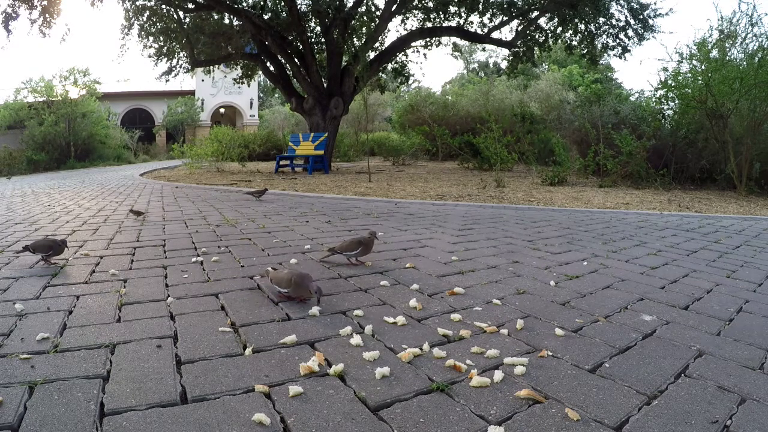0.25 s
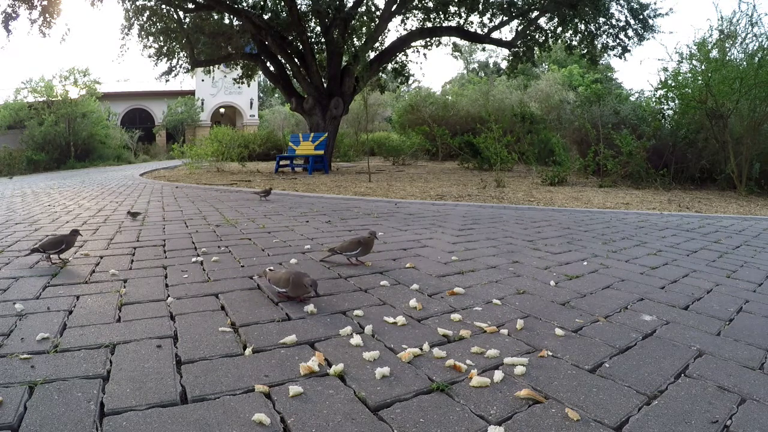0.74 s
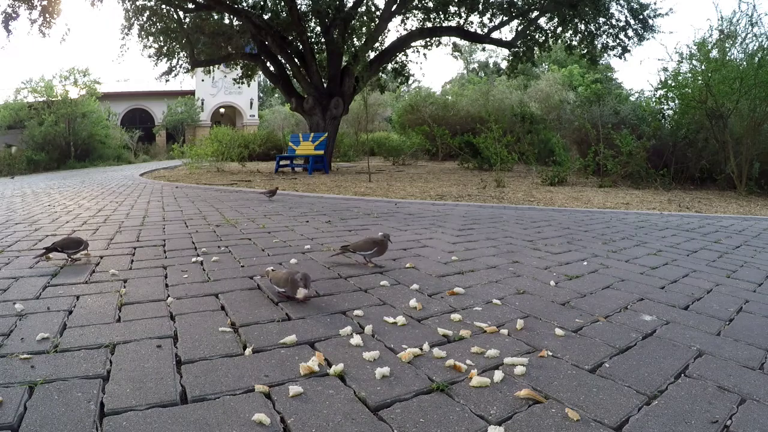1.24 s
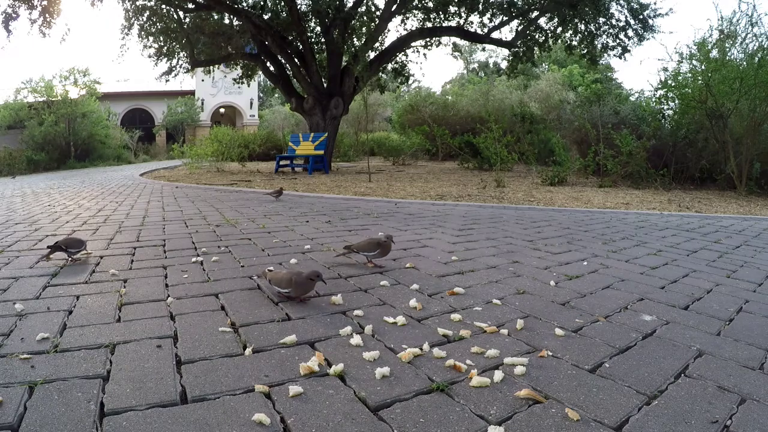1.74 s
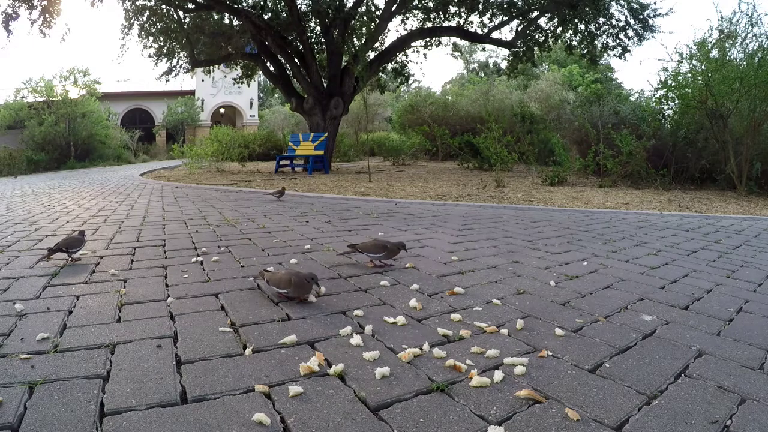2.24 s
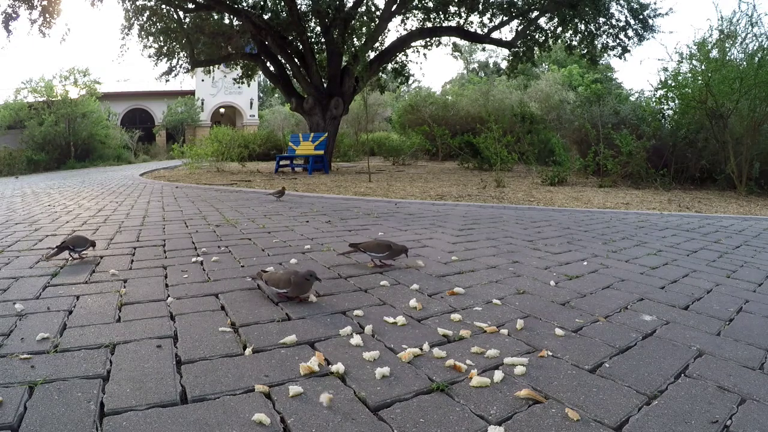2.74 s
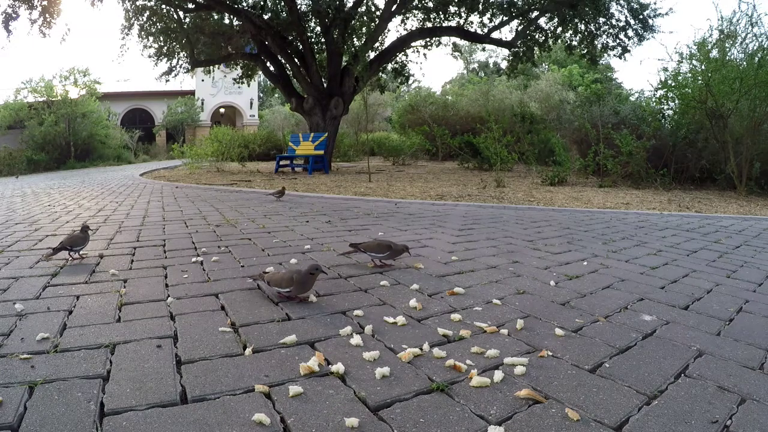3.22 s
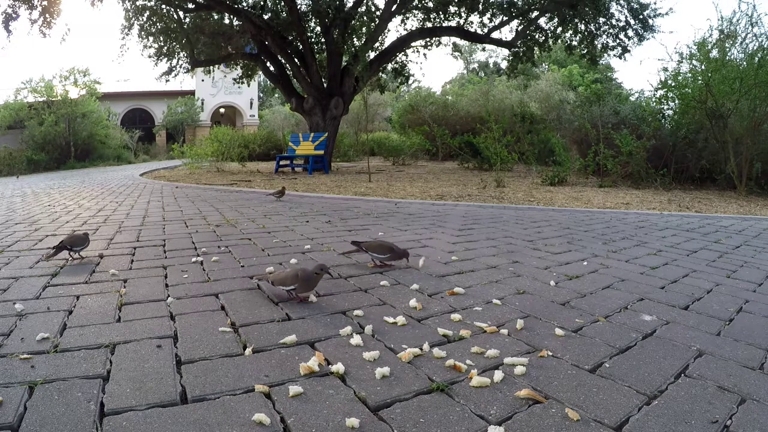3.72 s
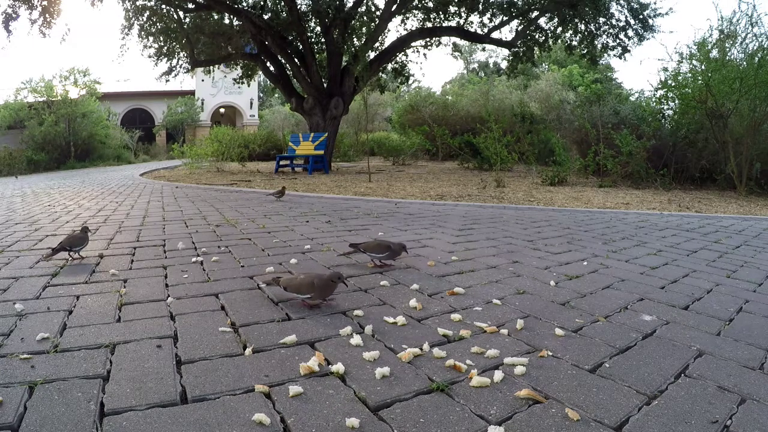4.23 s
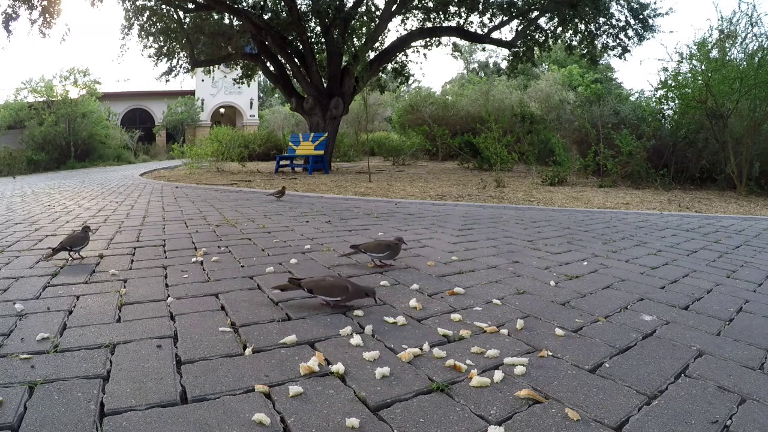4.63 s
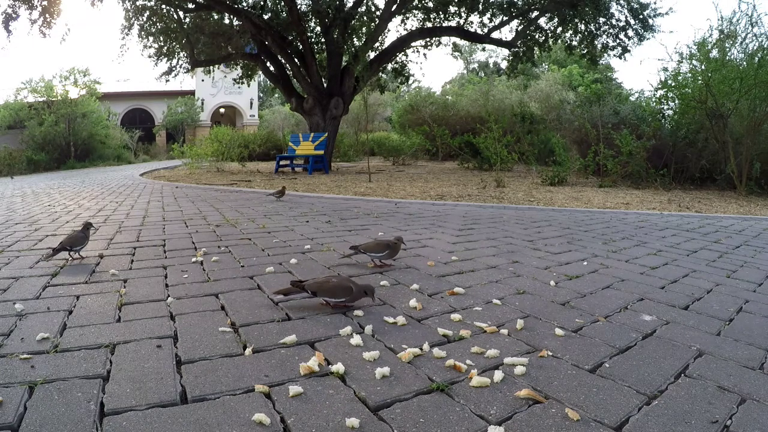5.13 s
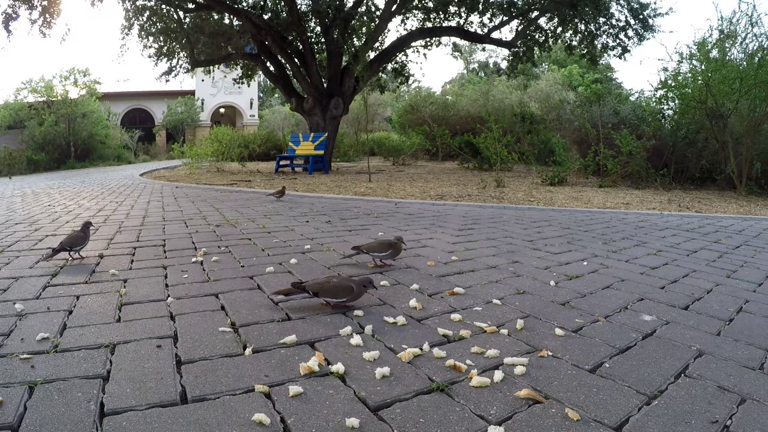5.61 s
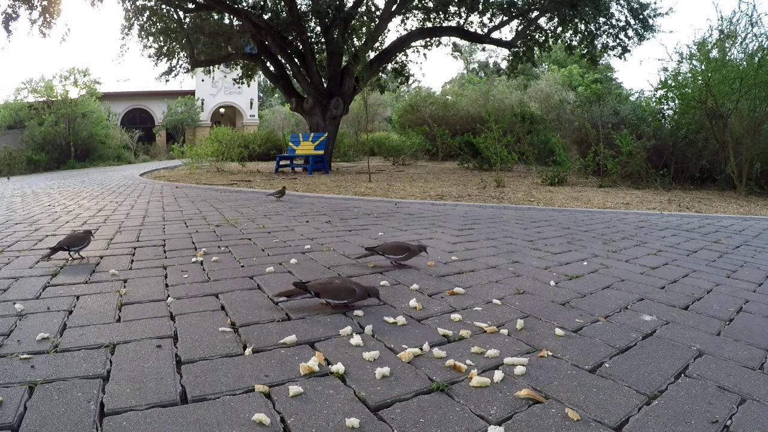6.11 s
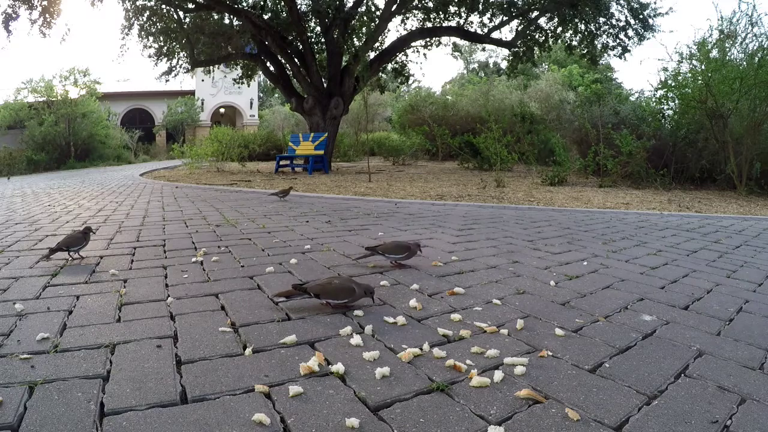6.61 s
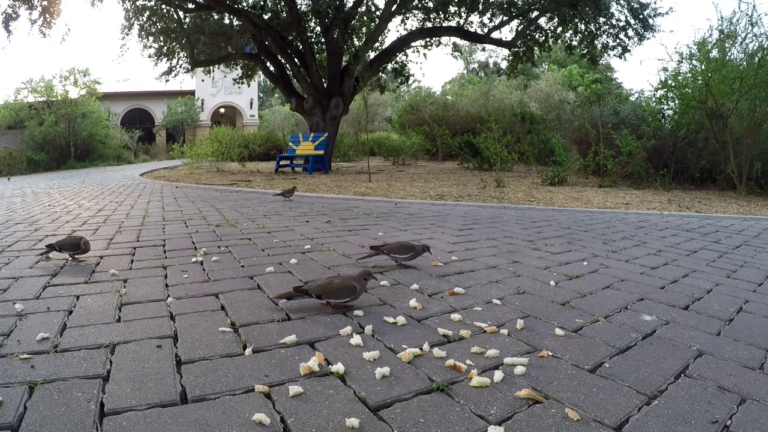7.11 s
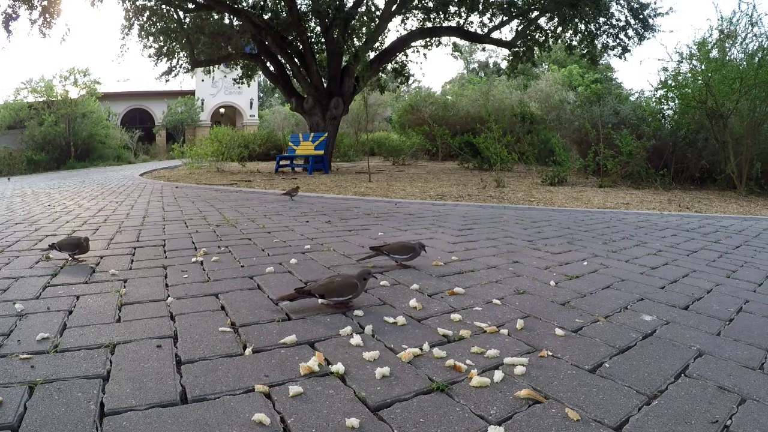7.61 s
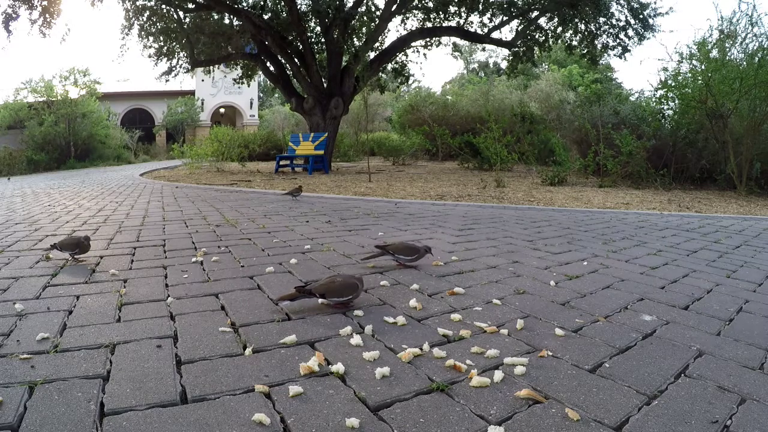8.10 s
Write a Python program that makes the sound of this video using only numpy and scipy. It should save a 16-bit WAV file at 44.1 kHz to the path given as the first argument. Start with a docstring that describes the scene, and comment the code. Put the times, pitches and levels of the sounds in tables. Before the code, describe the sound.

A harsh bird rasps three-syllable phrases, a nearer bird squeals and chatters, then several hoarse birds erupt in a loud overlapping chorus over low hum.

```python
"""Chachalacas over a humming park square

One bird rasps three-syllable phrases, a far one answers, then three voices overlap in a loud chorus.
Uneven membrane pulses and puffs of air, coloured by throat resonances, make the rasps, cries and squeals.
A nearer bird squeals and chatters; wavering sines make a dove's coo and a small bird's peeps, and a beak taps.
Scattered echoes surround most calls; filtered noise and two drones make a low machine hum and a faint hiss."""
import sys
import numpy as np
from scipy import signal
from scipy.fft import rfft, irfft, next_fast_len
from scipy.io import wavfile

SR = 44100
rng = np.random.default_rng(int(sys.argv[2]) if len(sys.argv) > 2 else 0)


def master_out(mix):
    """Clip the mix to full scale and print it as 16-bit PCM to the path in sys.argv[1]."""
    frames = np.transpose(np.atleast_2d(mix))
    ceiling = np.clip(frames, -1, 1)
    pcm = np.round(ceiling * 32767).astype(np.int16)
    wavfile.write(sys.argv[1], SR, pcm)


N = 368235
T = np.arange(N) / SR

# Syllables of the first bird, three phrases of three. Each row: start in seconds, length in seconds,
# pitch in Hz, rise in Hz per second, relative level in dB, swell in dB, relative ringing tone level in dB.
RASP_SYLLABLES = [(0.051, .14, 614.3, 606, -37, -6, -43), (.255, 0.1, 580.7, 1001, -33.5, -3.5, -35.5),
                  (0.394, 0.29, 602, -0.5, -36, -3, -38.5), (1.013, 0.13, 612.5, 500.5, -35, -11, -45.5),
                  (1.185, 0.12, 613.7, 1009, -33, -10.5, -39), (1.315, 0.22, 597.6, 102, -36, -5, -38),
                  (1.947, .15, 613, 499, -35.5, -7.5, -71), (2.126, .11, 625, 1190, -32.5, -5, -39),
                  (2.262, 0.22, 615, 252.5, -35, -4, -37)]
# Distant syllables: a far bird's phrase twice, then faint stray calls, the last from another bird.
# Each row: start in seconds, length in seconds, pitch in Hz, rise in Hz per second, relative level in dB,
# swell in dB, relative ringing tone level in dB.
DISTANT_SYLLABLES = [(3.24, 0.11, 630, 99, -50.5, 10, -51), (3.46, 0.093, 631.6, 101, -50.5, -16, -46),
                     (3.61, 0.18, 626.4, -60.5, -47, -2, -46), (4.205, 0.1388, 659, 201, -48.5, 0, -50),
                     (4.42, 0.072, 633, -100, -45, -9, -51), (4.565, 0.1934, 638.4, 62, -49.5, -10, -47.5),
                     (4.79, 0.22, 625, -4.5, -62.5, -5, -60), (5.11, 0.113, 587, -14, -57, 1, -54),
                     (5.2, 0.078, 636, 3.5, -62, -6, -54), (5.54, 0.066, 738, -14, -50.5, -5, -59),
                     (5.62, .11, 727, -1200, -50.5, 0, -50.5)]
# Hoarse syllables of the chorus: low ones from one bird and brighter, arched ones from a higher bird.
# Each row: start in seconds, length in seconds, pitch in Hz, rise in Hz per second, relative level in dB,
# swell in dB, relative undertone level in dB, brightness from 0 to 1.
HOARSE_SYLLABLES = [(5.64, 0.084, 625, 301, -42, -3, -70, 0.11),
                    (5.833, 0.15, 641, 999, -34.5, -8, -56, 0.13),
                    (5.979, 0.099, 657, 4, -33, 4.5, -54, 0.48),
                    (6.142, 0.16, 674.2, 6.5, -33.5, -7, -70, 0.91),
                    (6.397, 0.17, 623.5, 1099.5, -32.5, 2, -50, 0),
                    (6.608, 0.13, 664, 805, -29, 5, -51, 0.06),
                    (6.735, .18, 672.7, 48, -28.5, 2, -46.5, 0.2),
                    (6.953, 0.2, 821, -4.5, -26.5, -1.5, -57, 0.96),
                    (7.241, 0.051, 646.5, 1103.5, -60, -7, -54, 0.03),
                    (7.297, .145, 637.2, 950, -32, 6, -50, 0),
                    (7.505, 0.13, 677, 847, -28.5, 0, -48.5, 0.04),
                    (7.627, 0.19, 679.4, 149, -27.5, 0, -46.5, 0.06),
                    (7.863, 0.2, 801, -3, -30.5, -10, -63, 0.95),
                    (8.216, .15, 652, 697, -29.5, 4.5, -48, 0.01)]
# Throat colour of the gliding notes and wails. Each row: frequency in Hz, relative level in dB.
CLEAR_THROAT = [(600, -32), (1050, -23), (1450, 12), (2000, 2), (2400, -10.5), (2850, -19), (3250, -7.5),
                (3800, -4.5), (4150, -13), (4480, -0.5), (4850, -13), (5500, -8), (7000, -13.5),
                (8000, -27), (9500, -27), (13000, -40)]

# A note's ends lie below its top by this much for each second of its length.
RASP_SAG_HZ_PER_S, HOARSE_SAG_HZ_PER_S = 200, 220


def from_db(db):
    """Decibels to gain."""
    return 10 ** (np.asarray(db) / 20)


def rms_one(x):
    """Scale to unit power."""
    return x / np.sqrt(np.mean(x ** 2) + 1e-20)


def in_time(rows):
    """Each column of a curve at every sample."""
    s, *columns = np.transpose(rows)
    return [np.interp(T, s, column) for column in columns]


def during(rows):
    """Open while a curve lasts, with short fades outside it."""
    first, last = rows[0][0], rows[-1][0]
    return np.interp(T, [first - .03, first, last, last + .03], [0, 1, 1, 0])


def coloured(x, spectrum):
    """Give a steady sound a spectrum; unit power."""
    size = next_fast_len(len(x))
    hz, db = np.transpose(spectrum)
    bins = np.maximum(np.arange(size // 2 + 1) * SR / size, 1)
    skirts = np.minimum(1, bins / hz[0]) ** 2 * np.minimum(1, hz[-1] / bins) ** 2
    colour = from_db(np.interp(np.log(bins), np.log(hz), db))
    return rms_one(irfft(rfft(x, size) * skirts * colour, size)[:len(x)])


def flutter(rate_hz, count):
    """Random wavering up to a given rate; spread 1."""
    run_in = 8000  # samples for the filter to settle
    lowpass = signal.butter(2, rate_hz, fs=SR, output="sos")
    return rms_one(signal.sosfilt(lowpass, rng.standard_normal(count + run_in))[run_in:])


def swing(pitch_hz, jitter, rate_hz):
    """Phase of a membrane whose cycles are uneven."""
    return 2 * np.pi * np.cumsum(pitch_hz * (1 + jitter * flutter(rate_hz, len(pitch_hz)))) / SR


def syrinx(phase, hiss, shimmer_db, count=20, partials=None):
    """One smeared pulse and one puff of air a cycle, of uneven strength; partials may have their own gains."""
    pulses = 0
    for k in range(count):
        gain = partials[k] if partials else 1
        pulses = pulses + gain * np.cos((k + 1) * phase + np.pi / 2 * k * k / count)
    puffs = rms_one((1 + np.cos(phase)) * rng.standard_normal(len(phase)))
    return (rms_one(pulses) + hiss * puffs) * from_db(shimmer_db * flutter(145, len(phase)))


def add(out, start_s, sound):
    """Mix a sound in at a given time."""
    at = max(0, int(start_s * SR))
    out[at:at + len(sound)] += sound[:max(0, N - at)]


def arch(start_hz, middle_hz, end_hz, count):
    """Pitch bends through a middle value with the pressure behind a chip."""
    u = np.linspace(-1, 1, count)
    slope = (end_hz - start_hz) / 2
    bend = (start_hz + end_hz) / 2 - middle_hz
    return middle_hz + slope * u + bend * u ** 2


def glide(length_s, pitch_hz, rise_hz_per_s, sag_hz_per_s, flat=2):
    """Pitch of a note: an arch on a slope, deeper the longer it lasts; a higher power holds the top longer."""
    u = np.linspace(-1, 1, int(max(length_s, .01) * SR))
    return pitch_hz + length_s * (rise_hz_per_s * u / 2 - sag_hz_per_s * np.abs(u) ** max(flat, 1))


def phrasing(rows, sags_hz_per_s, attack_s, release_s):
    """Gain and pitch of a run of syllables: each opens, swells while it is held, then dies away."""
    power, pitch = np.zeros(N), np.full(N, float(rows[0][2]))
    sags = np.broadcast_to(sags_hz_per_s, len(rows))
    for (start, length, pitch_hz, rise, db, swell_db, *_), sag in zip(rows, sags):
        t, at = T[:SR], int(max(start, 0) * SR)
        held = from_db(db + swell_db * (np.minimum(t / length, 1) - .5))
        opening = np.tanh(t / attack_s) ** 1.16
        dying = np.exp(-np.maximum(t - length, 0) / release_s)
        add(power, start, (held * opening * dying) ** 2)
        # the last pitch holds until the next syllable
        pitch[at:] = np.pad(glide(length, pitch_hz, rise, sag), (0, N), "edge")[:N - at]
    return np.sqrt(power), pitch


def rattle(rate_hz, depth_db):
    """The membranes slap in uneven beats, which give a rasp its grain."""
    beats = np.sin(swing(np.full(N, float(rate_hz)), .35, rate_hz=60))
    return rms_one(from_db(depth_db * beats))


def throat_shift(rows, opens, wander):
    """Factor on the throat's resonances: they climb through each syllable and wander."""
    points = [(start + length * (.5 + .4 * end), end) for start, length, *_ in rows for end in (-1, 1)]
    opening, = in_time(points)
    return 1 + opens * opening + wander * flutter(22, N)


def moving_throat(x, throat, shift, count=7):
    """Colour a voice with resonances that slide by a factor, by fading between fixed throats."""
    steps, out = np.linspace(.88, 1.12, count), 0
    for step, share in zip(steps, np.eye(count)):
        throat_now = [(hz * step, db) for hz, db in throat]
        out = out + np.interp(shift, steps, share) * coloured(x, throat_now)
    return out


def restless(x, depth_db, rate_hz, count=16):
    """Beak and throat never hold still, so each region of the voice swells and fades on its own."""
    size = next_fast_len(N)
    spectrum, hz = rfft(x, size), np.arange(size // 2 + 1) * SR / size
    centres, out = np.geomspace(900, 7000, count), 0
    for share in np.eye(count):
        gain = rms_one(from_db(depth_db * flutter(rate_hz, N)))
        out = out + gain * irfft(spectrum * np.interp(hz, centres, share), size)[:N]
    return out


def note(pitch_hz, rough, throat, edge, jitter, shimmer_db, count, air=0.58, torn_db=0, bright_db=0):
    """An unsteady note through a throat; roughness adds jitter and air, and partials tear and return alone."""
    n = len(pitch_hz)
    phase = swing(pitch_hz * (1 + .005 * flutter(50, n)), jitter * rough, rate_hz=205)
    partials = []
    for k in range(count):
        tear_db = torn_db * np.tanh(flutter(40, n)) if torn_db else 0
        partials.append(from_db(bright_db * min(k, 3) + tear_db))
    voice = coloured(syrinx(phase, air * rough, shimmer_db, count=count, partials=partials), throat)
    return voice * signal.windows.tukey(n, np.clip(edge, 0, 1))


def notes(rows, sag_hz_per_s, throat, flat=2, **voice):
    """Notes that share an arch and a voice."""
    out = np.zeros(N)
    for start, length, pitch_hz, rise, db, rough, bright_db in rows:
        pitch = glide(length, pitch_hz, rise, sag_hz_per_s, flat)
        add(out, start, from_db(db) * note(pitch, rough, throat, bright_db=bright_db, **voice))
    return out


def rasping_bird():
    """Nearly chaotic pulses rattle through a row of sliding throat resonances."""
    # Throat colour of the first bird. Each row: frequency in Hz, relative level in dB.
    rasp_throat = [(400, -56), (700, 2.5), (900, 0.5), (1250, 5), (1550, -1.5), (1930, 5), (2200, -1),
                   (2500, 5.5), (2680, 2.5), (2840, 7), (3050, 0), (3600, -4), (4400, 2), (5300, -1.5),
                   (6250, 1.5), (6750, -14), (7500, -14.5), (9800, -17), (12000, -38)]
    gain, pitch_hz = phrasing(RASP_SYLLABLES, RASP_SAG_HZ_PER_S, attack_s=0.055, release_s=0.036)
    pulses = syrinx(swing(pitch_hz, jitter=.1, rate_hz=400), hiss=.4, shimmer_db=1.0)
    pulses = pulses * rattle(100, depth_db=6)
    rasp = moving_throat(pulses, rasp_throat, throat_shift(RASP_SYLLABLES, opens=.01, wander=.016))
    return gain * from_db(2.4) * restless(rasp, depth_db=2.2, rate_hz=25)


def hoarse_birds():
    """Jitter smears high harmonics into a rasp: low syllables from one bird, bright arched ones from a higher."""
    # Throat colour of the low syllables. Each row: frequency in Hz, relative level in dB.
    low_throat = [(500, -43), (950, 1), (1350, 2.5), (1750, 0.5), (2150, -5.5), (2400, 6.5), (2700, 0.5),
                  (3000, -3.5), (3450, -2), (4050, -5.5), (4550, 5), (5150, -6), (6100, -4.5), (6800, -21),
                  (7900, -19), (9700, -20), (12500, -50)]
    # Throat colour of the bright syllables. Each row: frequency in Hz, relative level in dB.
    bright_throat = [(500, -49), (1050, 3.5), (1500, 11.5), (1900, 5.5), (2230, -18), (2550, 8),
                     (3000, -3.5), (3400, 9.5), (3800, 4), (4350, 4), (5000, 6), (5750, 8), (7200, -8.5),
                     (7900, -13.5), (9400, -9.5), (13000, -35)]
    brights = np.clip([row[-1] for row in HOARSE_SYLLABLES], 0, 1)
    sags_hz_per_s = HOARSE_SAG_HZ_PER_S + 480 * brights
    gain, pitch_hz = phrasing(HOARSE_SYLLABLES, sags_hz_per_s, attack_s=0.036, release_s=0.026)
    bright_points = [(start + length * share, bright)
                     for (start, length, *_), bright in zip(HOARSE_SYLLABLES, brights) for share in (.1, .9)]
    brightness, = in_time(bright_points)
    pulses = syrinx(swing(pitch_hz, jitter=.06, rate_hz=170), hiss=.4, shimmer_db=1.0)
    pulses = pulses * rattle(105, depth_db=3.8)
    shift = throat_shift(HOARSE_SYLLABLES, opens=.015, wander=.015)
    rasp = (1 - brightness) * moving_throat(pulses, low_throat, shift)
    rasp = rasp + brightness * moving_throat(pulses, bright_throat, shift)
    return gain * from_db(-2.2) * restless(rasp, depth_db=2.5, rate_hz=25)


def throat_tones():
    """The low harmonics scoop up and ring through each rasping syllable; under the hoarse ones they growl."""
    # Colour of the ringing tone. Each row: frequency in Hz, relative level in dB.
    ring_throat = [(550, -13.5), (850, 0), (1150, 4.5), (1320, 5), (1600, -10.5), (2000, -60), (2400, -42),
                   (2900, 4.5), (3500, -77)]
    # Colour of the growling undertone. Each row: frequency in Hz, relative level in dB.
    growl_throat = [(450, -6.5), (660, 8), (1000, 7), (1370, 3.5), (1700, 7), (2050, -7), (2600, 1.5),
                    (4000, -13)]
    ring_lingers_s, growl_lingers_s = 0.01284, 0.0217  # added to the syllable's length
    scoop, scoop_s = 0.0901, 0.02192  # the ring starts flat by this share and slides up with this time constant
    out = np.zeros(N)
    for start, length, pitch_hz, rise, _, _, db in RASP_SYLLABLES + DISTANT_SYLLABLES:
        pitch = glide(length + ring_lingers_s, pitch_hz, rise, RASP_SAG_HZ_PER_S)
        pitch = pitch * (1 - scoop * np.exp(-T[:len(pitch)] / scoop_s))
        pitch = pitch * (1 + .025 * flutter(45, len(pitch)))
        ring = note(pitch, .48, ring_throat, edge=.2, jitter=.11, shimmer_db=2.2, count=5, air=2.0, torn_db=4)
        add(out, start, from_db(db - 0.1) * ring)
    for start, length, pitch_hz, rise, _, _, db, _ in HOARSE_SYLLABLES:
        pitch = glide(length + growl_lingers_s, pitch_hz, rise, HOARSE_SAG_HZ_PER_S)
        pitch = pitch * (1 + .018 * flutter(60, len(pitch)))
        growl = note(pitch, 0.5, growl_throat, edge=0.26, jitter=.1, shimmer_db=3.2, count=5, air=1.9, torn_db=3)
        add(out, start, from_db(db + 5.7) * growl)
    return out


def wails(curves, rough, bright_db, voice):
    """Long arched cries whose level breaks and returns."""
    out = np.zeros(N)
    for rows in curves:
        held = slice(int(rows[0][0] * SR), int(rows[-1][0] * SR))
        pitch_hz, level_db = (column[held] for column in in_time(rows))
        cry = note(pitch_hz, rough, CLEAR_THROAT, edge=.15, bright_db=bright_db, **voice)
        out[held] += from_db(level_db) * cry
    return out


def clear_calls():
    """Sounds that stand out of the rasp with a true pitch: short glides, wails and yelps."""
    # Short gliding notes: bright glides in the first bird's opening syllables, a stray call, then the
    # chorus's yips. Each row: start in seconds, length in seconds, pitch in Hz, rise in Hz per second,
    # relative level in dB, roughness as a factor, brightness in dB per partial.
    glide_rows = [(.02, 0.073, 826, 1250, -47.5, 1.2, -2), (.1, 0.1, 891, 1252, -40.5, 1.24, -1),
                  (.18, 0.069, 1060, 1250, -46.5, .5, -10), (1.01, 0.086, 931, 1250, -44.5, 0.83, 0),
                  (1.83, 0.042, 795, 1253, -54, 0.19, -1), (1.945, 0.13, 904, 1506, -42, 0.9, -3.5),
                  (5.21, 0.095, 843.5, 1250, -52.5, 0.93, 0), (5.61, 0.12, 803, -900, -47, 0.4, 2),
                  (5.875, 0.067, 1008, 3002, -38.5, 0.37, 0.5), (5.937, 0.019, 860, -12000, -39, 0.35, 4),
                  (5.955, 0.023, 917, 992, -37, 0.1, 0.5), (6.017, 0.055, 775, 1250, -55, 0.5, 0),
                  (6.058, 0.035, 800, 804, -31, 0, -1.5), (6.435, 0.056, 810, 600, -46, 0.24, 0.5),
                  (6.46, 0.048, 987, 2003, -45, 0.1, -4), (6.505, 0.056, 724, 1300, -35.5, 0.5, 6.5),
                  (6.682, 0.051, 917, -600, -36.5, 0.41, 0.5), (6.725, 0.046, 799, 1500, -36, 0.29, 5.5),
                  (6.758, 0.0514, 1004, 1201, -34.5, 0, -2), (6.87, 0.043, 798, 1798, -29.5, 0.4, 4),
                  (7.31, .07, 792.6, 1509, -46, 0.52, -2), (7.34, 0.067, 959, 1804.5, -41, .45, -5),
                  (7.391, 0.056, 748, 598, -31.5, 0.17, 3), (7.597, 0.04, 943, 5000, -37.5, 0.27, -1),
                  (7.633, 0.05, 785, 1408, -32, 0.13, 4.5), (7.668, 0.036, 1018, -1000, -34, 0.24, 2),
                  (7.773, 0.048, 785.3, 2600, -29, 0.15, 1.5), (8.299, 0.067, 759, 1248, -35, 0.2, 3)]
    # Clear yelps. Each row: start in seconds, length in seconds, pitch in Hz, rise in Hz per second,
    # level in dB, roughness as a factor, brightness in dB per partial.
    yelp_rows = [(5.88, .08, 1030, 2002, -41.5, .4, 1.5), (6.025, .08, 1045, 900, -39, 0.46, 2.5),
                 (6.15, .145, 1055, -300, -38.5, 0.15, 1.5)]
    # Throat colour of the yelps. Each row: frequency in Hz, relative level in dB.
    yelp_throat = [(700, 0), (1050, 3), (1500, 6), (2100, 0.5), (2700, -24), (3200, 3), (4200, -18),
                   (5300, -1), (6400, -4), (8000, -22), (13000, -34)]
    # Lower wails, one curve a cry. Each row: time in seconds, pitch in Hz, relative level in dB.
    low_curves = [
        [(6.97, 648, -44), (6.976, 658, -38), (7.008, 775.7, -31), (7.014, 791.6, -41), (7.03, 805, -26),
         (7.05, 802, -58), (7.062, 818, -32.5), (7.092, 811, -26.5), (7.102, 796, -40), (7.13, 760.4, -31),
         (7.19, 652.4, -54)],
        [(7.88, 674, -37), (7.898, 731, -35.5), (7.92, 785, -33), (7.934, 758, -50), (7.95, 805, -45),
         (7.974, 801.3, -25), (7.984, 776.6, -30.5), (8.01, 776.6, -29), (8.054, 701, -43), (8.068, 718.5, -37),
         (8.08, 702.6, -41)],
    ]
    # Higher wails, one curve a cry. Each row: time in seconds, pitch in Hz, relative level in dB.
    high_curves = [
        [(7.0, 895, -49), (7.006, 925, -36), (7.048, 963.2, -30), (7.076, 879.6, -49), (7.1, 937.5, -37),
         (7.15, 775.5, -51)],
        [(7.91, 824, -38), (7.94, 955, -33.5), (7.99, 935, -37), (8.018, 893, -43), (8.032, 813, -50),
         (8.05, 786.6, -38)],
    ]
    voice = dict(jitter=.04, shimmer_db=1.3, count=9, air=.9)
    glides = notes(glide_rows, 340, CLEAR_THROAT, edge=.5, torn_db=5, **voice)
    low = wails(low_curves, .19, 0, dict(voice, torn_db=3))
    high = wails(high_curves, .12, 1, dict(voice, torn_db=7))
    yelps = notes(yelp_rows, 1000, yelp_throat, flat=3, edge=.3, jitter=.09, shimmer_db=1.2,
                  count=6, air=1.2, torn_db=2.5)
    return from_db(2.0) * glides + from_db(1.5) * low + from_db(4.0) * high + yelps


def squeals():
    """The nearer bird's high notes, whose flat-topped arch sags steeply at the ends."""
    # Squeals. Each row: start in seconds, length in seconds, pitch in Hz, rise in Hz per second,
    # level in dB, roughness as a factor, brightness in dB per partial.
    squeal_rows = [(.812, 0.18, 1603, 5, -36, 0.083, -1.5), (2.095, 0.054, 1739, 0.5, -41.5, 0.082, 1.5),
                   (2.572, 0.058, 1640, 4, -39.5, 0.086, 1.5), (2.968, 0.06, 1616, 0, -37.5, 0.19, 2.5),
                   (3.11, 0.064, 1625, 0, -58, .16, 0), (3.412, 0.064, 1595, 0, -37.5, 0.2, 1),
                   (3.57, 0.037, 1650, 0, -50, 0.14, -2), (3.697, 0.029, 1210, 29996, -42.5, 0.17, -5),
                   (3.74, 0.054, 1317, -3800, -37, .05, -1), (3.89, 0.17, 1538, -400, -35, 0.25, 1)]
    # Throat colour of the squeals. Each row: frequency in Hz, relative level in dB.
    squeal_throat = [(1100, -26), (1650, -9), (2100, 6), (2700, 10.5), (3000, -14), (3220, -2.5),
                     (3700, -9), (4200, -12), (4750, -7.5), (5400, -17), (6400, -24), (8000, -27),
                     (9700, -28), (12000, -44)]
    return notes(squeal_rows, 2900, squeal_throat, flat=2.8, edge=.7, jitter=.045, shimmer_db=1.1,
                 count=6, torn_db=4)


def chatter(lead_s=.037, squeak_s=0.0266, swell_s=0.01, fade_s=0.017, burst_db=-10.5, fall_db=-11.5):
    """Each chip is a tiny arched squeak, then a whistle that plunges inside a harsh burst."""
    # Chattering chips. Each row: time of the burst's peak in seconds, relative chip level in dB,
    # level of the squeak before it in dB.
    chip_rows = [(1.6978, -36, -58), (1.79, -38, -47), (1.835, -42, -66), (1.877, -35, -54),
                 (2.551, -25, -42), (2.6563, -27, -36), (2.754, -25, -38), (2.851, -24, -37),
                 (2.9628, -20.5, -41), (3.083, -26.5, -38), (3.187, -26.5, -39.5), (3.354, -31, -43),
                 (3.459, -26, -38), (3.556, -27.5, -41), (3.6564, -28, -40), (3.706, -30, -55),
                 (3.827, -28.5, -48), (4.0636, -29, -46), (4.232, -30, -47), (4.324, -29.5, -40),
                 (4.4249, -28, -46), (4.527, -27, -48), (4.7152, -30, -48), (4.8328, -32.5, -48),
                 (4.9994, -39, -52)]
    # Colour of the harsh burst. Each row: frequency in Hz, relative level in dB.
    burst_colour = [(700, -19), (1500, -2.5), (2700, 5.5), (3700, -1.5), (5000, -6.5), (6500, -11.5),
                    (8000, -21), (13000, -37)]
    out, squeak_n, fall_n = np.zeros(N), int(squeak_s * SR), int(.022 * SR)
    t = T[:SR // 16] - .025  # zero at the burst's peak
    envelope = np.exp(np.minimum(t / swell_s, -t / fade_s)) * signal.windows.tukey(len(t), .5)
    detunes = 1 + 0.021 * rng.standard_normal(len(chip_rows))
    for (s, db, squeak_db), detune in zip(chip_rows, detunes):
        squeak = np.sin(swing(arch(1900, 2720, 2100, squeak_n) * detune, jitter=.02, rate_hz=330))
        fall = np.sin(swing(arch(3900, 2650, 2250, fall_n) * detune, jitter=.025, rate_hz=600))
        burst_phase = swing(arch(1700, 1400, 1000, len(t)), .12, rate_hz=300)
        burst = coloured(syrinx(burst_phase, .7, 1.8, count=9), burst_colour)
        add(out, s - lead_s, from_db(squeak_db) * squeak * np.hanning(squeak_n))
        add(out, s - fall_n / SR / 2, from_db(db + fall_db) * fall * np.hanning(fall_n))
        add(out, s + t[0], from_db(db + burst_db) * burst * envelope)
    return out


def distant_birds():
    """Rasps dulled by distance: airy uneven pulses through a still, darker throat."""
    # Throat colour of the distant calls. Each row: frequency in Hz, relative level in dB.
    distant_throat = [(450, -21), (650, -14), (880, -21), (1080, -2.5), (1270, 5), (1500, 3.5), (1800, 1.5),
                      (2200, -2), (2800, -13.5), (3600, -6.5), (4600, -5), (6000, -9), (7500, -35),
                      (12000, -47)]
    gain, pitch_hz = phrasing(DISTANT_SYLLABLES, 60, attack_s=0.028, release_s=0.047)
    phase = swing(pitch_hz, jitter=.06, rate_hz=250.0)
    return gain * from_db(5.5) * coloured(syrinx(phase, hiss=1.0, shimmer_db=5.5), distant_throat)


def dove():
    """One long, soft, almost pure coo that sags at its end."""
    # Curve of the coo. Each row: time in seconds, pitch in Hz, level in dB.
    coo_curve = [(0, 726, -56), (.2, 717, -54), (.4, 738, -59), (.6, 714, -56), (.9, 713, -48.5),
                 (1.08, 698.7, -53.5), (1.2, 653, -58)]
    pitch_hz, level_db = in_time(coo_curve)
    tone = rms_one(np.sin(swing(pitch_hz, jitter=0.011, rate_hz=93)))
    return during(coo_curve) * from_db(level_db) * tone


def peeps():
    """A small bird's thin whistles, blurred by a fast quaver."""
    # Thin high sips. Each row: start in seconds, length in seconds, pitch in Hz, level in dB,
    # roughness from 0 to 1.
    peep_rows = [(1.938, 0.049, 4800, -46.5, 0.22), (2.943, 0.054, 8500, -52, 0.42),
                 (3.418, 0.068, 9700, -62, .12), (3.674, 0.088, 8460, -54.5, 0.42),
                 (4.342, .105, 8230, -62.5, .4), (4.531, 0.069, 4876, -50, 0.32),
                 (4.961, 0.063, 8240, -67.5, 0.3), (5.517, 0.053, 4890, -54, 0.09)]
    out = np.zeros(N)
    for start, length, pitch_hz, db, rough in peep_rows:
        phase = swing(glide(length, pitch_hz, 0, sag_hz_per_s=2300), 0.135 * rough, rate_hz=380)
        add(out, start, from_db(db) * rms_one(np.hanning(len(phase)) * np.sin(phase)))
    return out


def pecks(t60=.035):
    """A beak taps the paving: a dry burst of noise that dies at once on the brick."""
    # Taps. Each row: start in seconds, starting level in dB.
    peck_rows = [(5.340, -34)]
    # Colour of a tap. Each row: frequency in Hz, relative level in dB.
    peck_colour = [(500, -1), (1200, -2), (1900, 11), (3200, -17), (6000, -17), (8500, -10), (13000, -36)]
    out, t = np.zeros(N), T[:SR // 10]
    for s, db in peck_rows:
        tap = coloured(rng.standard_normal(len(t)), peck_colour)
        add(out, s, from_db(db - 60 * t / t60) * tap)
    return out


def among_trees(x, scatter_db, tail_db, scatter_t60=0.14, tail_t60=0.65):
    """Trunks and paving scatter a call at once; walls and far trees return a duller tail."""
    t = T[:SR]
    sparse = rng.random(SR) < 1500 / SR  # about 1500 echoes a second
    scatter = rng.standard_normal(SR) * sparse * from_db(-60 * t / scatter_t60)
    tail_colour = [(400, -7.5), (1400, -1.5), (2500, -10.5), (5000, -6.0), (10000, -5.5)]  # Hz, dB
    tail = coloured(rng.standard_normal(SR), tail_colour)
    tail = tail * from_db(-60 * t / tail_t60) * (1 - np.exp(-t / 0.048))
    echoes = (from_db(scatter_db) * rms_one(scatter) + from_db(tail_db) * rms_one(tail)) / np.sqrt(SR)
    return x + signal.fftconvolve(x, echoes)[:N]


def drone(pitch_hz, levels, jitter, rate_hz):
    """A wavering tone that slowly swells and fades."""
    tone = rms_one(np.sin(swing(np.full(N, float(pitch_hz)), jitter, rate_hz)))
    return from_db(in_time(levels)[0]) * tone


def background():
    """Distant machinery rumbles and drones under a faint outdoor hiss."""
    # Colour of the machine rumble. Each row: frequency in Hz, relative level in dB.
    rumble_colour = [(20, -40), (90, -32), (112, -28.5), (130, -10), (150, 1), (190, -0.5), (250, -5),
                     (340, -10.5), (500, -17), (900, -18.5), (2000, -59)]
    # Colour of the outdoor hiss. Each row: frequency in Hz, relative level in dB.
    air_colour = [(100, -31), (200, -4), (500, 6), (800, -2.5), (1300, 0.5), (2200, 1.5), (3200, -7),
                  (5000, -10.5), (8000, -10.5), (10400, -15.5), (10900, -14), (11300, -21), (15000, -27)]
    # Swells of the lower drone. Each row: time in seconds, level in dB.
    low_levels = [(0, -56), (1.2, -73), (5.2, -68), (5.6, -48), (6.3, -51.5), (6.9, -43.5), (7.6, -54.5),
                  (8.35, -46)]
    # Swells of the higher drone. Each row: time in seconds, level in dB.
    high_levels = [(0, -62), (2.3, -55.5), (2.9, -47.5), (4.3, -54.5), (8.35, -47.5)]
    rumble = from_db(-46.5) * coloured(rng.standard_normal(N), rumble_colour)
    low = drone(165.2, low_levels, jitter=0.0088, rate_hz=12.4)
    high = drone(181.7, high_levels, jitter=0.02062, rate_hz=11.5)
    air = from_db(-50.5) * coloured(rng.standard_normal(N), air_colour)
    return rumble + low + high + air


def scene():
    """Rasps, clear calls and nearer sounds each get their own echoes; dove and background stay dry."""
    rasps = among_trees(rasping_bird() + distant_birds() + hoarse_birds(), scatter_db=1, tail_db=-8.5)
    calls = among_trees(throat_tones() + clear_calls(), scatter_db=-11, tail_db=-14)
    near = among_trees(squeals() + chatter() + peeps() + pecks(), scatter_db=-11, tail_db=-9)
    return (from_db(-4.0) * rasps + calls + near + dove() + background())[None]


def record(dry):
    """An elliptic low-pass cuts the top steeply."""
    cutoff_hz = 15200
    return signal.sosfilt(signal.ellip(10, .1, 80, cutoff_hz, fs=SR, output="sos"), dry)


dry = scene()
out = record(dry)
master_out(out)
```